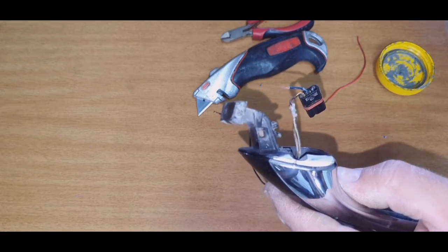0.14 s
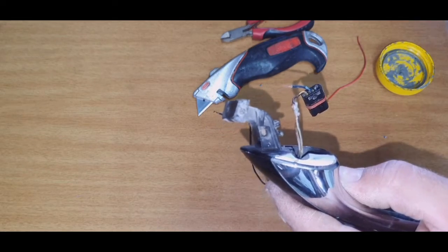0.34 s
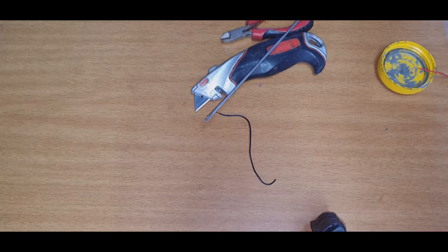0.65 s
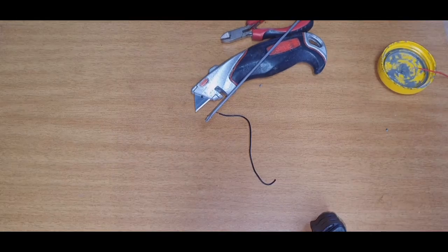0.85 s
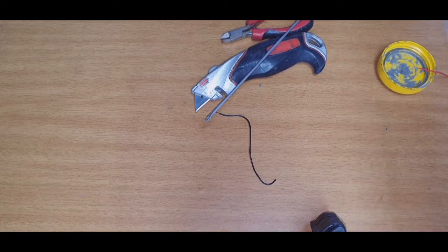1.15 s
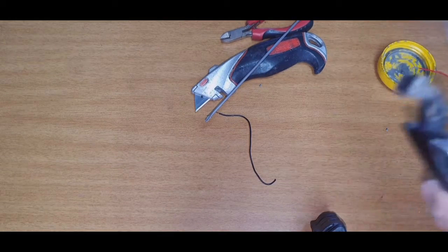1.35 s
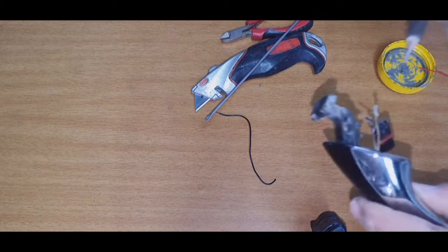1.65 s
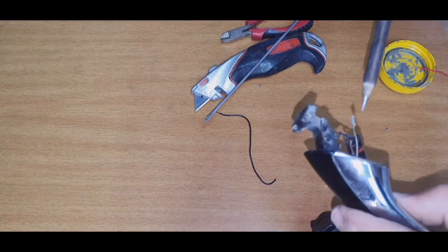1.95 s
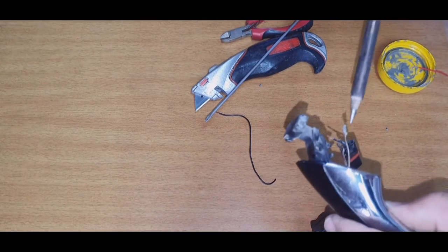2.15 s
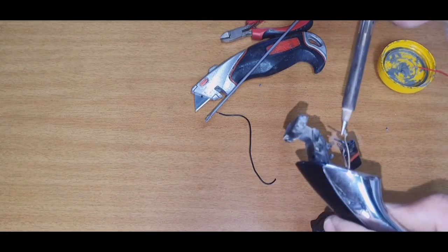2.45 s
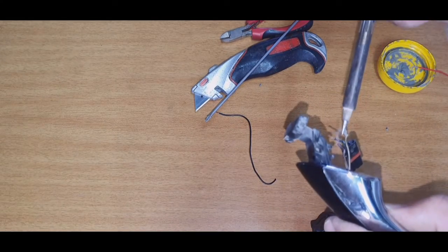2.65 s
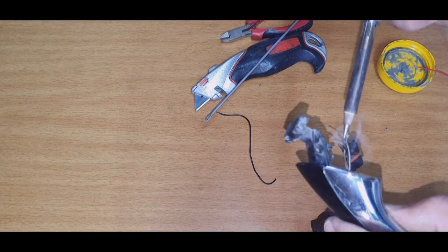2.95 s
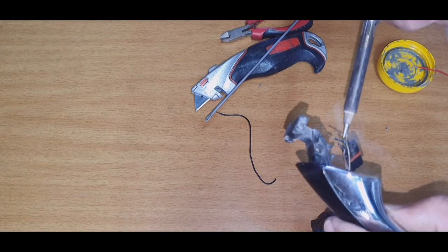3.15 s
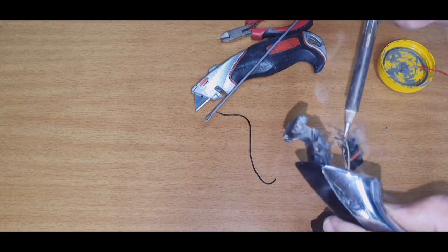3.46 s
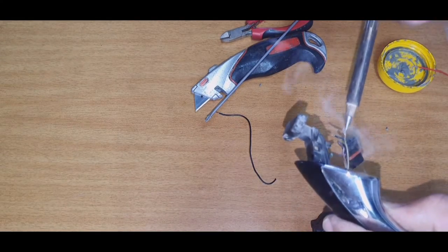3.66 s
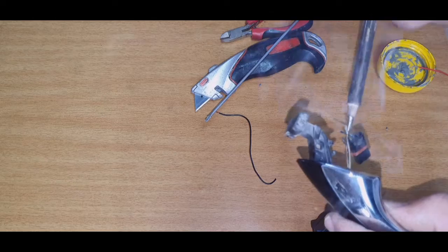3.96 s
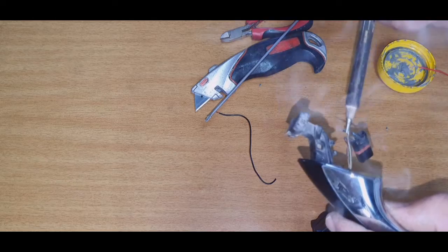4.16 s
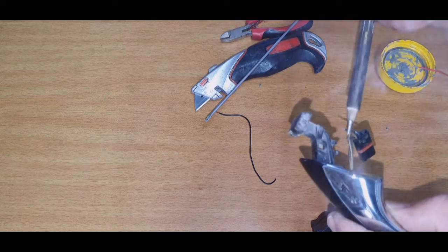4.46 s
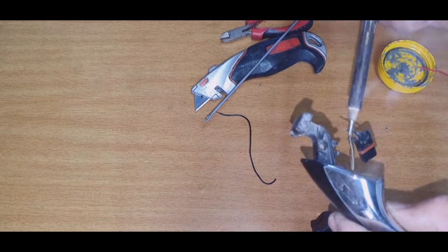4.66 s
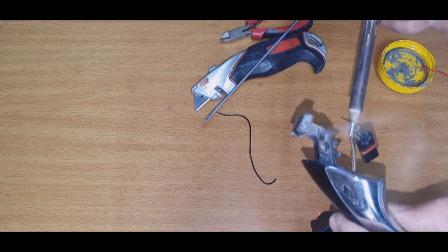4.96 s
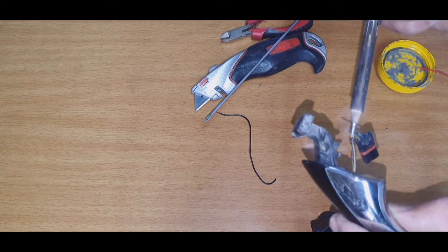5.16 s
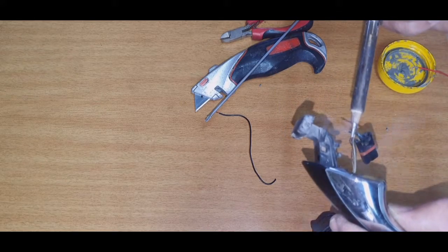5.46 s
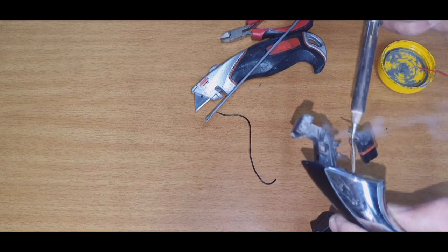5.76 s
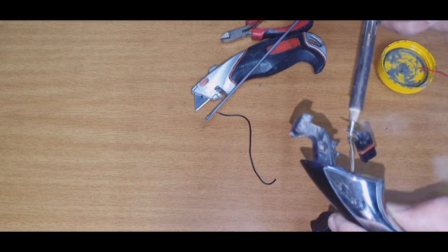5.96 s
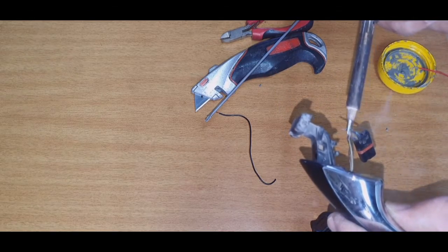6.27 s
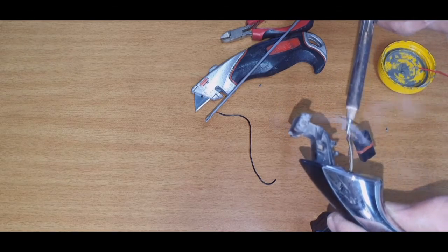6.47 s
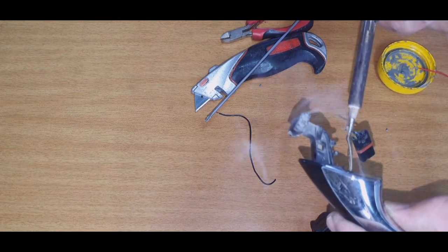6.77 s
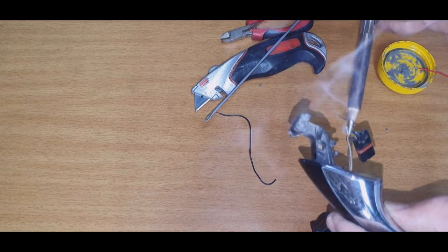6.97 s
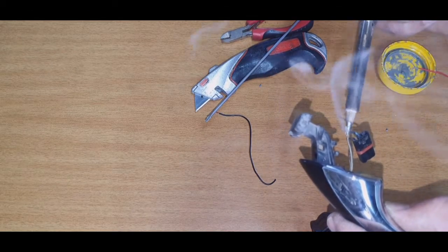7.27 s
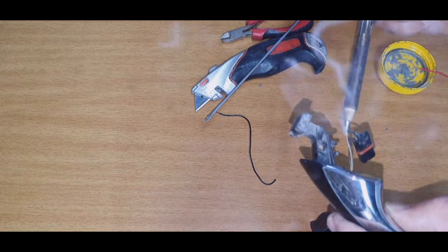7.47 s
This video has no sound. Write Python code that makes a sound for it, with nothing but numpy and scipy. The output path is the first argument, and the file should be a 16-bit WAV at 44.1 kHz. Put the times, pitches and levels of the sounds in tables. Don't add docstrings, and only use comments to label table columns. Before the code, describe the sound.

Two knocks on a wooden desk, then soldering flux sizzles and spits in bursts while a heavy vehicle's deep rumble swells outside.

```python
import sys
import numpy as np
from scipy import signal
from scipy.fft import rfft, irfft, next_fast_len
from scipy.io import wavfile
from scipy.ndimage import uniform_filter1d

SR = 44100
rng = np.random.default_rng(int(sys.argv[2]) if len(sys.argv) > 2 else 0)


def output_pcm(signal):
    pcm = np.clip(np.atleast_2d(signal).T, -1, 1) * 32767
    wavfile.write(sys.argv[1], SR, np.round(pcm).astype(np.int16))


def how_loud(loudness_db):
    steps = np.asarray(loudness_db, float) / 20
    return 10 ** steps


N = 336163
STEP_S = np.arange(0, N / SR + .01, .002)

# t/s, length/s, boil level/dB, dying/(dB/s), lower fizz against boil/dB
BURSTS = [(2.2, .13, -58.5, 80, -2), (2.59, .07, -56.5, 80, -3), (2.6, .8, -62, 500, 2),
          (3.43, .08, -69, 250, -5), (3.953, .092, -59.5, 350, 4), (4.33, .08, -75, 120, 4),
          (4.52, .2, -61, 55, 3), (4.905, .02, -60, 300, 3), (4.94, .42, -64.5, 60, 4.5),
          (5.4, .28, -68, 150, 5.5), (5.68, .3, -71, 100, 4), (6.015, .15, -70, 23, 4),
          (6.82, .11, -85, 70, 6), (7.06, .2, -82, 140, 9)]


def evened(x):
    return x / np.sqrt(np.mean(x ** 2) + 1e-20)


def read(points, hz):
    f, value = np.transpose(points)
    return np.interp(np.log(hz + 1), np.log(f + 1), value)


def curves(rows):
    s, *columns = np.transpose(rows)
    t = np.arange(N) / SR
    gate = np.clip(np.minimum(t - s[0], s[-1] + 0.012 - t) / 0.045, 0, 1)
    return [np.interp(t, s, c) for c in columns] + [gate]


def smooth(control):
    return np.interp(np.arange(N) / SR, STEP_S, control)


def swells(rows):
    bumps = 0
    for s, half, db in rows:
        bumps = bumps + how_loud(db) * np.cos(np.pi / 2 * np.clip((STEP_S - s) / half, -1, 1))
    return smooth(bumps)


def resonate(x, hz, width):
    turn = np.exp(2j * np.pi * np.cumsum(hz * np.ones(len(x))) / SR)
    r = np.exp(-np.pi * width / SR)
    return 2 * (turn * signal.lfilter([1 - r], [1, -r], x / turn)).real


def blurred_tone(hz, width):
    return evened(resonate(resonate(rng.standard_normal(N), hz, width), hz, width))


def ports(shared, own, colour, same, balance, lag=((1, 0), (2, 0))):
    size = next_fast_len(N)
    hz = np.fft.rfftfreq(size, 1 / SR)
    likeness = np.clip(read(same, hz), -1, 1)
    right, other = rfft(shared, size), rfft(own, size)
    left = likeness * right + np.sqrt(1 - likeness ** 2) * other
    left = left * np.exp(-1j * read(lag, hz))
    tilt = how_loud(read(balance, hz) / 2)
    return irfft(np.array([left * tilt, right / tilt]) * how_loud(read(colour, hz)), size)[:, :N]


def band(x, lo_hz, hi_hz):
    return signal.sosfiltfilt(signal.butter(2, [lo_hz, hi_hz], "bandpass", fs=SR, output="sos"), x)


def wander(hz):
    return evened(band(rng.standard_normal(N), hz / 10, hz))


def patches(shape, bins, frames):
    field = rng.standard_normal(shape[::-1]).T
    return evened(uniform_filter1d(uniform_filter1d(field, bins, 0), frames, 1))


def flux():
    # f/Hz, level/(dB per Hz)
    boil_colour = [(1060, -28), (1800, -11), (2010, -18), (2470, -9), (2890, -15.5), (3340, -8.5),
                   (3970, -11), (4310, -11), (4800, -9.5), (5310, -4), (6970, -3), (7700, -6.5), (9000, -5),
                   (10500, -5.5), (15000, -3), (15800, -2)]
    # f/Hz, width/Hz, level/dB
    cavities = [(4240, 290, 1), (5380, 800, -16), (12800, 340, -15), (15270, 190, -5.5)]
    top_db, lower_db = np.transpose(BURSTS)[[2, 4]]
    boil_db = boiling(top_db, rise_s=.02, tail_db=-16.5, tail_db_per_s=56)
    low_db = boiling(top_db + lower_db, rise_s=.03, tail_db=-18.5, tail_db_per_s=15) - boil_db

    sizes = how_loud(2.0 * np.minimum(rng.exponential(1, N), 6)) * (rng.random(N) < 9000 / SR)
    puffs = evened(np.sqrt(abs(uniform_filter1d(sizes ** 2, 12)))) + 0.51
    ticks = how_loud(10 + 2.8 * np.minimum(rng.exponential(1, N), 3)) * (rng.random(N) < 500 / SR)
    dry_pops = (rng.random(N) < 200 / SR) * (np.arange(N) / SR > 4.85)
    sputter = how_loud(3 * np.minimum(rng.exponential(1, N), 3)) * dry_pops
    puffs = puffs + puffs.mean() * signal.lfilter([1], [1, -.96], sputter)
    drive = evened(puffs * rng.standard_normal((2, N))) + signal.lfilter([1], [1, .5], ticks)

    hiss = fizz(drive, boil_colour, low_db + 0.14)
    ringing = 0
    for hz, width, db in cavities:
        ringing = ringing + how_loud(db) * np.array([resonate(side, hz, width) for side in hiss])
    z = signal.stft(hiss + ringing, nperseg=512)[2]
    streaks_db = 3.0 * patches(z.shape[1:], bins=1, frames=30)
    boil = signal.istft(z * how_loud(streaks_db), nperseg=512)[1][:, :N]
    return how_loud(boil_db + 0.9 * wander(60) + 1.1 * wander(12)) * boil


def boiling(levels_db, rise_s, tail_db, tail_db_per_s):
    power = 1e-14
    for (s, length, _, dying, _), db in zip(BURSTS, levels_db):
        after = np.maximum(STEP_S - s - length, 0)
        fall = how_loud(-2 * dying * after) + how_loud(2 * (tail_db - tail_db_per_s * after))
        rise = (1 - np.exp(-np.maximum(STEP_S - s, 0) / rise_s)) ** 4
        power = power + how_loud(2 * db) * rise * fall
    return smooth(10 * np.log10(power))


def fizz(drive, colour, low_db):
    # f/Hz, share
    fizz_same = [(2000, 0.1), (4200, 0.31), (5200, 0.4), (6300, 0.39), (9600, 0.54), (11000, 1),
                 (15800, 0.63)]
    # f/Hz, level/dB
    fizz_balance = [(60, -4), (150, -9), (380, 3), (950, 37), (2380, -0.5), (5980, 7), (15000, -5.5)]
    # f/Hz, phase/rad
    fizz_lag = [(3400, 0), (4500, 1.4), (6300, 3.0), (9600, 4), (12000, 4.5), (15800, 4.5)]
    top_power = np.mean(how_loud(read(colour, np.arange(10000, 15800, 50))) ** 2)
    top_gain = np.sqrt(top_power * 5800 / (SR / 2))
    x = ports(*drive, colour, fizz_same, fizz_balance, fizz_lag) / top_gain
    low = band(x, 800, 6900)
    return x - low + low * how_loud(low_db)


def spits():
    # t/s, peak level/dB, top against it/dB
    bubbles = [(2.4765, -51, -1), (2.511, -54, -7), (3.496, -58, 5), (3.5024, -58, 2), (3.991, -46, -6),
               (4.126, -55, -6), (4.4008, -51, -7), (4.912, -47, -4), (4.9195, -45, -4), (4.9695, -48, -5),
               (4.98, -50, 2), (5.07, -43, -7), (5.1058, -44, -10), (5.1352, -44, -10), (5.187, -42, -5),
               (5.2023, -44, -3), (5.235, -47, -8), (5.255, -42, -8), (5.3075, -30.5, -11),
               (5.3315, -44, -4), (5.3675, -48, -3), (5.4553, -47, -8), (5.463, -46, -9), (5.559, -41, -8),
               (5.6138, -49, -3), (5.645, -45, -1), (5.6705, -40, -4), (5.7555, -47, -8), (5.853, -51, -5),
               (5.9037, -52, -5), (5.9496, -53, -6), (6.0165, -52, -5), (6.029, -49, -7), (6.0528, -48, -7),
               (6.0726, -44, -4), (6.1186, -48, -4), (6.3618, -52, -7), (6.8506, -60, -10),
               (6.8735, -58, -10), (6.8985, -57, -7), (6.9142, -44, -14), (7.078, -57, -12),
               (7.0945, -55, -12), (7.1795, -49, -9), (7.2048, -50, -10), (7.2105, -52, -7),
               (7.232, -57, -8), (7.268, -59, -6), (7.296, -60, -6)]
    # f/Hz, level/(dB per Hz)
    spit_colour = [(880, -24), (1500, -8), (3050, -4), (3800, -1), (5500, 3), (7770, -1), (9750, -5),
                   (13400, 4), (15800, -4)]
    drive, low_db, t = np.zeros((2, N)), np.zeros(N), np.arange(500) / SR
    for (s, db, top_db), puff in zip(bubbles, rng.standard_normal((len(bubbles), 2, 500))):
        at = round(s * SR) + 22
        snap = 1.6 * (t == 0) + .65 * puff * np.exp(-t / .0017)
        drive[:, at:at + 500] += how_loud(db + top_db + 2.5) * snap
        low_db[at - 100:at + 600] = -top_db - 7.0
    return fizz(drive, spit_colour, low_db)


def whistle():
    # t/s, f/Hz, level/dB
    jet_path = [
        (3.455, 3800, -83),
        (3.525, 4170, -79),
        (3.56, 4120, -75),
        (3.6, 4290, -75),
        (3.655, 4030, -73),
        (3.72, 4140, -75),
        (3.765, 3900, -79),
        (3.84, 3870, -82),
        (3.895, 3740, -86),
    ]
    hz, level_db, gate = curves(jet_path)
    hz = uniform_filter1d(hz, size=900) * (1 + .005 * wander(40))
    tone = .7 * blurred_tone(hz, 55) + .9 * np.sin(2 * np.pi * np.cumsum(hz) / SR)
    halo = evened(resonate(resonate(rng.standard_normal(N), 0.92 * hz, 600), 1.08 * hz, 600))
    jet = how_loud(level_db + 3.0) * gate * (tone + how_loud(-2) * halo)
    return np.array([1.2 * np.roll(jet, 3), .8 * jet])


def engine():
    # t/s, firing f/Hz
    speed = [(1.75, 116), (2.06, 110.6), (2.25, 99.2), (2.45, 84.4), (2.57, 77.6), (2.76, 70.5),
             (2.93, 69.5), (3.14, 72.5), (3.86, 72.8), (4.23, 74.54), (4.79, 73.7), (5.12, 72),
             (5.62, 69.26), (6.1, 72.7), (6.56, 70.6), (7.03, 69.08), (7.32, 66.5), (7.62, 65.94)]
    # centre t/s, half length/s, level/dB
    firing_swells = [(2.05, 0.38, -64), (2.33, 0.013, -55), (2.41, 0.039, -56), (2.59, 0.093, -41),
                     (2.78, 0.13, -39), (2.92, 0.088, -37.5), (3.13, 0.096, -51), (3.48, .17, -45),
                     (3.66, 0.071, -44), (3.79, 0.093, -40.5), (4.0, 0.15, -41), (4.28, 0.25, -32),
                     (4.6, 0.23, -35.5), (5.14, 0.26, -38), (5.46, 0.092, -42), (5.63, 0.048, -47.5),
                     (5.78, 0.11, -53.5), (6.05, 0.16, -38.5), (6.3, 0.24, -41.5), (6.64, 0.17, -37.5),
                     (7.03, 0.21, -32), (7.2, 0.15, -37.5), (7.46, 0.099, -46), (7.63, 0.069, -42.5)]
    # centre t/s, half length/s,
    # level/dB
    half_swells = [(1.33, 0.053, -46), (1.91, .2, -54), (3.35, 0.61, -55), (4.03, 0.13, -51),
                   (4.33, 0.27, -51), (4.7, .13, -54), (5.03, 0.095, -54), (6.2, 0.46, -60),
                   (7.18, 0.14, -68), (7.62, .1, -68)]
    # centre t/s, half length/s, level/dB
    third_swells = [(2.7, 0.23, -64), (3.49, 0.1, -64), (4.01, 0.18, -59.5), (5.05, 0.23, -69),
                    (6.07, 0.2, -50.5), (6.55, 0.31, -62.5), (7.15, 0.27, -56), (7.62, 0.14, -64)]
    hz, gate = curves(speed)
    turn = 2 * np.pi * np.cumsum(hz * (1 + 0.01354 * wander(20.6))) / SR
    blur = how_loud(-30.0) * evened(resonate(rng.standard_normal(N), hz, 28))
    level = swells(firing_swells) + how_loud(-62) * gate
    firing = level * how_loud(0.56 * wander(24)) * (np.sin(turn) + how_loud(-29.0) * np.sin(2 * turn) + blur)

    shudder = evened(resonate(rng.standard_normal(N), 39.1, 0.93))
    half = swells(half_swells) * how_loud(-6.0 + 1.4 * wander(8.7)) * shudder
    third_level = swells(third_swells) + how_loud(-79.5) * gate
    third = third_level * how_loud(-4.5 + 7.1 * wander(24)) * np.sin(3 * turn)
    return (np.sqrt(2) * (firing + third) + half) * how_loud([[-.3], [.3]])


def tyres():
    # t/s, level/dB
    roar_path = [(1.5, -80.5), (2.1, -77.5), (2.6, -69), (3.3, -66), (3.65, -64.5), (4.3, -57),
                 (4.65, -58.5), (4.85, -62), (5.1, -58.5), (5.47, -59), (5.55, -63), (5.97, -62.5),
                 (6.17, -53.5), (6.7, -56), (6.8, -63), (7.24, -64), (7.45, -72), (7.62, -69)]
    # f/Hz, level/(dB per Hz)
    roar_colour = [(53, -36), (90, -6.5), (117, -23), (146, -7.5), (205, -13), (248, -18.5), (402, -16),
                   (439, -22.5), (494, -17), (1030, -19.5), (3000, -49.5), (3900, -93), (6600, -120)]
    # f/Hz, likeness
    roar_same = [(60, 0), (180, 1.06), (550, 0.73), (1650, 0.33), (4970, -2), (15000, -3)]
    # f/Hz, level/dB
    roar_balance = [(60, -10), (180, 0.5), (550, 2), (1650, 6.5), (4970, -7.5), (15000, -6)]
    # f/Hz, phase/rad
    roar_lag = [(300, 0.1), (2000, 0.34)]
    level_db, gate = curves(roar_path)
    bright_db = np.interp(np.arange(N) / SR, [2.63, 3.6], [-14, 7.86])
    bright_db = bright_db - 0.24 * (level_db - np.median(level_db))
    roar = ports(*rng.standard_normal((2, N)), roar_colour, roar_same, roar_balance, roar_lag)
    top = band(roar, 1430, 3500)
    roar = (roar - top + top * how_loud(bright_db)) / np.std(band(roar, 380, 1330))
    return how_loud(level_db + 1.24 * wander(21) + 1.0 * wander(2.6)) * gate * roar


def knocks():
    # t/s, peak level/dB, then crack/dB, room/dB and first tick/dB against the ring
    blows = [
        (0.6008, -50, -8, -8, -11),
        (1.2891, -27.5, -6, -16, -26),
    ]
    # delay/s, level/dB
    bounces = [
        (0.05, -5),
        (.0115, -12),
    ]
    # f/Hz, level/dB, t60/s
    edge_modes = [(330, -7, .09), (480, 0, .09), (740, -10, .1), (920, -9, .16), (990, -10, .2),
                  (1200, -16, .16), (1780, -21, .1)]
    # f/Hz, level/dB, t60/s
    desk_modes = [(74.6, -13, 0.54), (162, -20, 0.21), (269, -18, 0.038), (398, 1.5, 0.06), (624, -20, 0.1),
                  (856, -10, 0.08), (950, -7, 0.06), (1060, 7, 0.015), (1200, -6, 0.03), (1350, -20, 0.08),
                  (1600, -24, 0.03), (1910, -31, 0.079), (2390, -32, 0.04)]
    # f/Hz, level/(dB per Hz)
    crack_colour = [(88, -44), (150, 0), (419, 3), (615, -20), (905, 4), (1170, 1), (1540, -42),
                    (1950, -31), (6670, -43), (12000, -71), (15600, -93), (22000, -120)]
    # f/Hz, level/(dB per Hz)
    echo_colour = [(88, -19), (150, -2), (220, -7), (389, 6.5), (615, -17), (921, -12.5), (2430, -32),
                   (6800, -40), (12000, -52), (15600, -77), (22000, -120)]
    # f/Hz, t60/s
    room_decay = [(80, 0.28), (300, 0.15), (1000, 0.42), (4000, 0.31), (9000, 0.14)]
    t, long_t, out = np.arange(8000) / SR, np.arange(SR // 2) / SR, np.zeros((2, N))
    colour = how_loud(read(crack_colour, np.fft.rfftfreq(8000, 1 / SR)))
    noises = rng.standard_normal((len(blows), 3, SR // 2))
    for blow, modes, (again_s, again_db), noise in zip(blows, (edge_modes, desk_modes), bounces, noises):
        s, db, crack_db, room_db, tick_db = blow
        ring = sum(how_loud(mode_db - 60 * t / t60) * np.sin(2 * np.pi * hz * t) for hz, mode_db, t60 in modes)
        ring = ring * np.minimum(t / 0.0028, 1)
        ring = ring / abs(ring).max()
        ring = ring + how_loud(again_db) * np.interp(t - again_s, t, ring, left=0)

        crack = evened(irfft(rfft(noise[0, :8000]) * colour))
        crack = crack * np.minimum(t / 0.00056, 1) * how_loud(-60 * t / 0.039)
        tick = band(noise[0, :8000] * np.exp(-t / 0.0014), 2000, 6300)

        hz, late, z = signal.stft(noise[1:] + 0.16 * noise[0], SR, nperseg=512)
        z = z * how_loud(read(echo_colour, hz)[:, None] - 60 * late / read(room_decay, hz)[:, None])
        tail = signal.istft(z, SR, nperseg=512)[1][:, :SR // 2]
        tail = tail / np.std(tail[:, :1000]) * np.minimum(long_t / 0.0023, 1)

        at = round(s * SR)
        out[:, at:at + 8000] += how_loud(db + tick_db) * tick
        out[:, at:at + 8000] += how_loud(db + np.array([[1.5], [-1.5]])) * (ring + how_loud(crack_db - 7.5) * crack)
        out[:, at:at + SR // 2] += how_loud(db + room_db) * tail
    return out


def air():
    # f/Hz, level/(dB per Hz)
    air_colour = [(12, -46), (20, -18.5), (65, 5), (188, -5), (221, -5.5), (255, -13.5), (301, -14),
                  (447, -17.5), (576, -18.5), (630, -24.5), (715, -14.5), (872, -25), (1500, -32.5),
                  (1950, -57), (3300, -120)]
    # f/Hz, level/(dB per Hz)
    hiss_colour = [(880, -33), (1500, -4), (2000, -4), (2500, -8.5), (3500, -11), (5200, -17), (5700, -7),
                   (6300, -2), (6700, 2.5), (7000, -1.5), (7500, -9), (8200, -7), (10000, -17),
                   (15800, -18)]
    # f/Hz, likeness
    air_same = [(60, 0.85), (150, 0.94), (380, 0.28), (950, 0.12), (2380, -0.18), (5980, -0.065),
                (15000, -0.27)]
    # f/Hz, level/dB
    air_balance = [(60, -3), (180, 5.5), (550, 8.5), (1650, -0.5), (4970, 10.5), (15000, 5.5)]
    # f/Hz, width/Hz, level/dB, steady share 0-1
    hum_lines = [(156.8, 6.1, -64, 0.07), (200.2, 11, -61, 0.66), (298.5, 4, -77.5, 1),
                 (398.5, 15.4, -73, 0.47), (487.6, 13, -80.5, 0), (579, 12, -80, 0.1),
                 (706, 8.9, -82, 0.02)]
    floor = evened(ports(*rng.standard_normal((2, N)), air_colour, air_same, air_balance))
    hiss = evened(ports(*rng.standard_normal((2, N)), hiss_colour, air_same, air_balance))
    hum, t = 0, np.arange(N) / SR
    for hz, width, db, steady in hum_lines:
        line = np.sqrt(2 * steady) * np.sin(2 * np.pi * hz * t)
        hum = hum + how_loud(db) * (line + np.sqrt(1 - steady) * blurred_tone(hz, width))
    return how_loud(-59.5) * floor + how_loud(-75.1) * hiss + hum * how_loud([[.5], [-.5]])


def scene():
    return flux() + spits() + whistle() + engine() + tyres() + knocks() + air()


def low_pass(x):
    return signal.sosfilt(signal.butter(12, 15830, fs=SR, output="sos"), x)


def record(dry):
    edge = signal.firwin(1501, 15740, window=("kaiser", 9), fs=SR)
    mix = signal.oaconvolve(dry, edge[None], "same")
    return low_pass(mix)


dry = scene()
out = record(dry)
output_pcm(out)
```